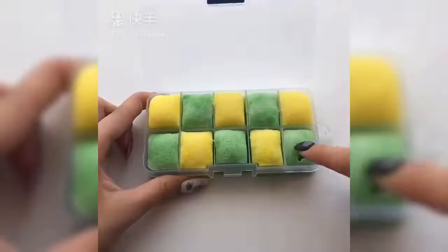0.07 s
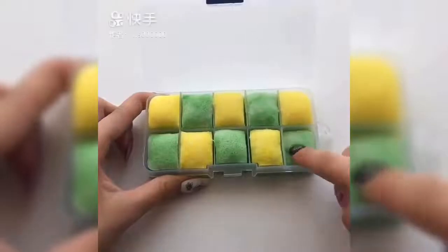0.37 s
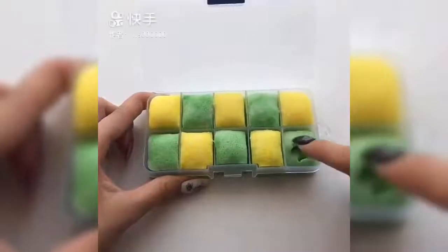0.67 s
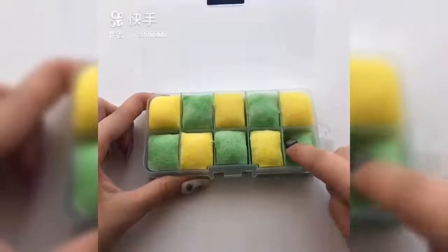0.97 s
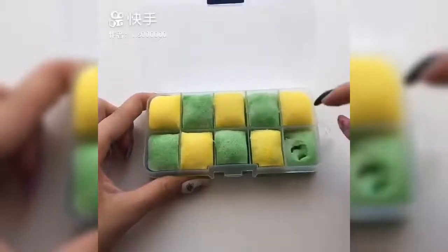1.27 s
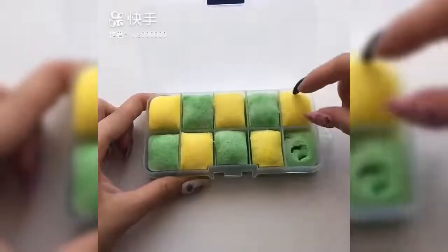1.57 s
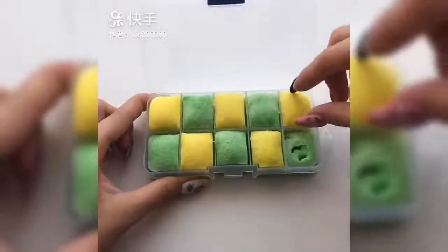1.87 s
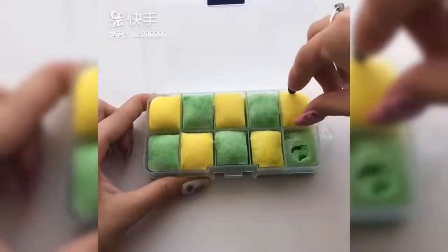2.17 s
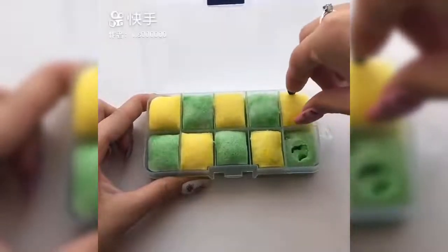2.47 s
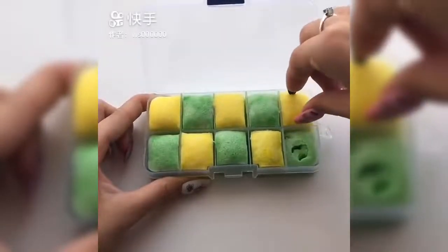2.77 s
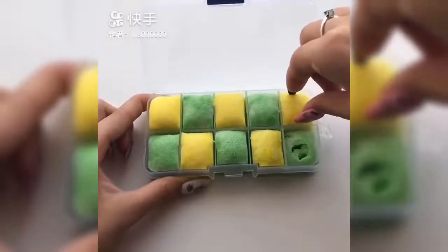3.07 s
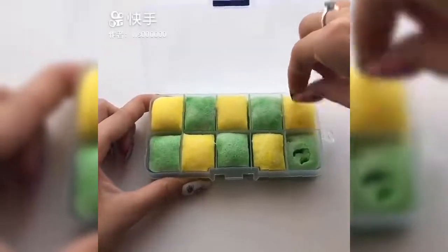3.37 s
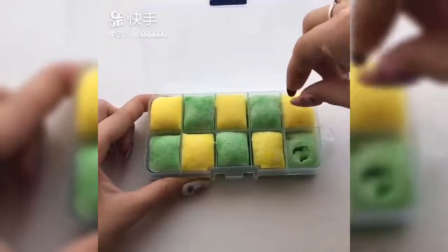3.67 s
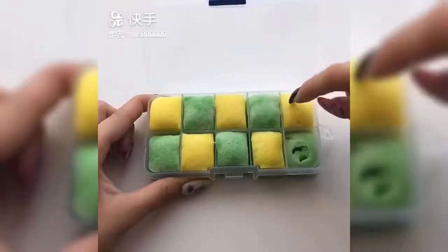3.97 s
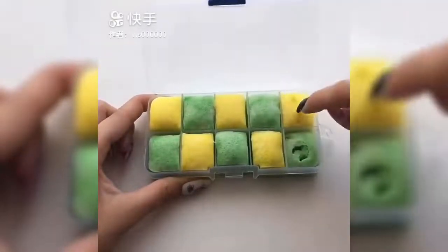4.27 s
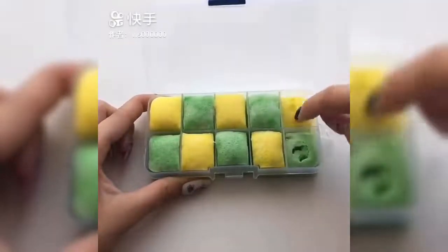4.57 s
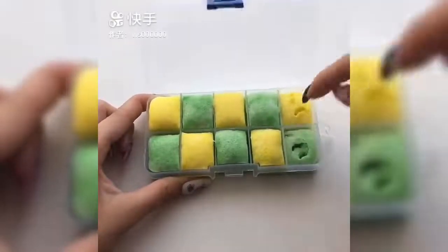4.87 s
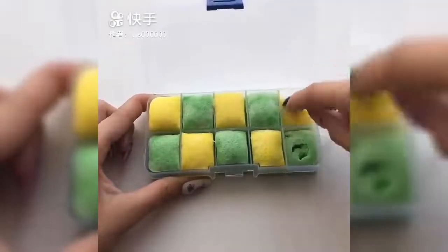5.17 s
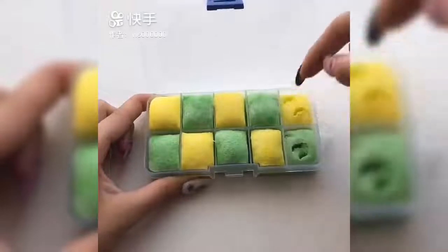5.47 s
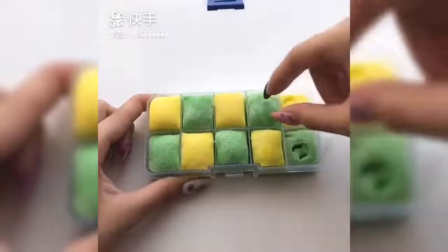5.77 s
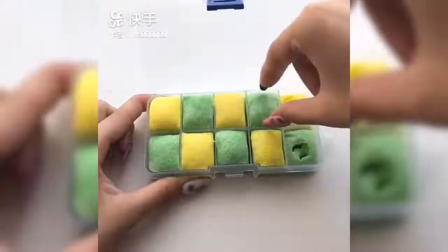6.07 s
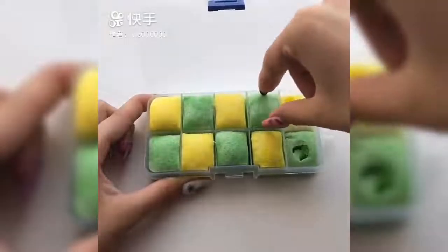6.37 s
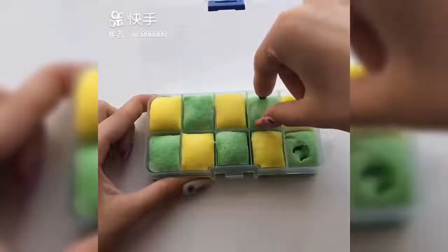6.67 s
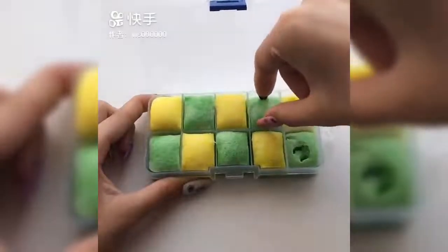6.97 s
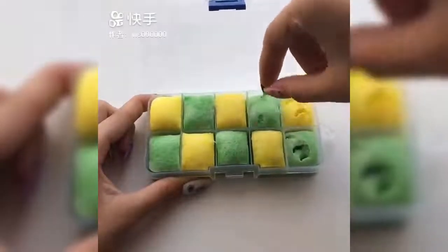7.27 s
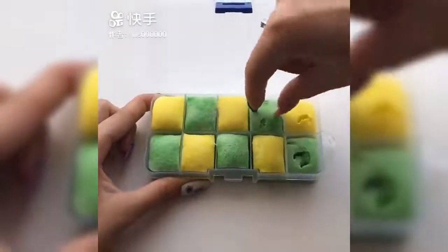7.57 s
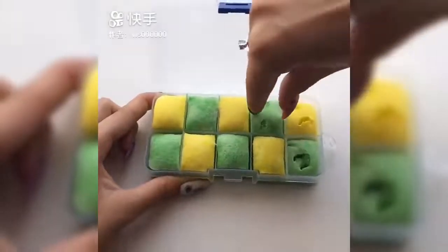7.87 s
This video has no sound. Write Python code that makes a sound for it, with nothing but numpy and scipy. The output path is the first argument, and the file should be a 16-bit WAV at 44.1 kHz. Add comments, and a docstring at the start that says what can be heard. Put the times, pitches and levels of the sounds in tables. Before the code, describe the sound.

Dried, foamy slime crackles and rips under fingertips, with air pockets popping and nails occasionally cracking against its plastic box.

```python
"""Crusted slime in a plastic box

A phone stands close to a compartment box on a table in a small, quiet room. Fingers poke and pinch the
crusted, foamy slime inside: each stroke tears countless tiny cells, a fizzy crackle, and air pockets
rip or pop. The box bumps on the table, fingers rub it, and a few times a nail snaps through the crust
onto the plastic. Behind it all are the walls' short answer and a low murmur of air."""
import sys
import numpy as np
from scipy import signal
from scipy.fft import rfft, irfft, next_fast_len
from scipy.io import wavfile
from scipy.ndimage import uniform_filter1d, map_coordinates

SR = 44100
rng = np.random.default_rng(int(sys.argv[2]) if len(sys.argv) > 2 else 0)


def unload_wav(signal):
    """Save mono or channel-first audio to the path in sys.argv[1] as 16-bit WAV at rate SR, clipped to [-1, 1]."""
    wavfile.write(
        sys.argv[1],
        SR,
        np.round(np.clip(np.atleast_2d(signal).T, -1, 1) * 32767).astype(np.int16),
    )


N = 349713

# Spectra of the sources. Each row: frequency in Hz, relative level in dB.
AIR_SPECTRUM = [(15, -55.5), (25, -11.5), (49, -6), (69, 0), (86, -9), (107, -5), (227, -2.5), (267, -5.5),
                (368, -7.5), (399, -11), (614, -16.5), (1050, -18), (1800, -24), (9050, -31.5),
                (15500, -40)]
CRUST_SPECTRUM = [(100, -33), (300, -7.5), (560, 1), (780, -10.5), (1200, 4), (1550, -2.5), (1950, 1.5),
                  (2400, -4), (3000, -2), (3700, -3), (4700, -6), (6500, -13), (9000, -22.5), (16000, -38)]
FIZZ_SPECTRUM = [(1000, -22), (3000, -12.5), (5000, -1), (8500, -1), (10500, -4.5), (15500, -7)]
SKIN_TICK_SPECTRUM = [(300, -25), (1000, 3), (2000, -3), (6000, -1.5), (8500, -8), (10500, -17.5),
                      (16000, -18)]
NAIL_SPECTRUM = [(100, -21.5), (300, -14), (410, 3.5), (780, -14.5), (1050, 2), (2600, -1), (4500, -4),
                 (6000, -10), (8500, -13.5), (10000, -20.5), (16000, -21.5)]
# A finger pushing into the slime. Each row: start in seconds, length in seconds, relative level in dB,
# swell over the stroke in dB, offset for the fizz in dB.
FINGER_STROKES = [ (0.047, 0.025, -47, -1.5, -12), (0.087, 0.015, -52, 5, -1.5),
                  (0.345, .08, -52, 2, -12.5), (0.439, 0.11, -44.5, -1, -2), (0.663, .063, -58, 13, -5),
                  (0.941, 0.095, -49, -0.5, -14), (1.059, 0.21, -54, -9, -6),
                  (1.287, 0.052, -56.5, -0.5, -13.5), (1.348, 0.035, -59.5, 13, -4),
                  (1.929, 0.027, -56, 9.5, -22), (2.365, .21, -67, 6.5, -1), (3.260, .035, -63.5, -3, -7),
                  (4.021, .085, -62, -0.5, -15), (4.172, 0.074, -61.5, -2, -24),
                  (4.662, 0.043, -64, 9, 0.5), (4.71, 0.081, -45.5, -5, -12), (4.816, 0.042, -38, -4.5, -5),
                  (4.868, .07, -52, -5, -4.5), (5.035, 0.029, -62, 5, -2), (5.065, .034, -49, 3, -2),
                  (5.36, 0.033, -40.5, 1, -9), (5.407, .13, -50, -3.5, -2.5),
                  (5.608, 0.032, -47, 4.5, -5.5), (6.044, 0.016, -53.5, 2.5, -14.5),
                  (6.104, .012, -51.5, -1, -1), (6.284, .016, -51.5, 2, -18), (6.668, 0.023, -50, -5, -1.5),
                  (6.711, 0.067, -52.5, 4, -6.5), (7.273, 0.017, -35.5, 0, -6),
                  (7.774, 0.051, -57.5, -1, -5.5), (7.899, 0.018, -52.5, 4.5, -10)]
# The crust ripping over a pocket. Each row: start in seconds, relative level in dB, pitch in Hz,
# decay of the rip in seconds.
CRUST_RIPS = [(0.099, -31.5, 3630, .005), (0.135, -50, 3000, .01), (0.214, -44.5, 2920, .015),
              (0.269, -32, 3800, 0.045), (0.3035, -32, 2730, 0.078), (0.342, -38, 3020, .04),
              (0.3605, -30.5, 2420, .024), (0.4346, -26, 1610, .03), (0.633, -38.5, 2600, 0.022),
              (0.905, -43.5, 2460, .02), (1.0233, -28, 2600, .005), (1.3792, -31, 4200, 0.0032),
              (1.73, -32, 1270, 0.08), (2.069, -30, 3250, 0.0016), (2.177, -35.5, 2330, 0.12),
              (2.744, -43, 6600, .005), (3.6023, -37, 1500, .012), (4.298, -44, 2200, .08),
              (4.71, -30.5, 1900, .006), (5.0628, -37.5, 2300, .02), (5.091, -30.5, 3100, .004),
              (5.354, -25, 1850, .15), (5.621, -32, 1900, .08), (6.1583, -32, 1740, .031),
              (6.203, -43, 3500, .025), (6.228, -34.5, 3200, .016), (6.304, -41, 1900, 0.0076),
              (7.2779, -26, 1700, .004), (7.746, -39, 1500, 0.03), (7.9084, -24.5, 3050, .011)]
# The box bumping on the table. Each row: start in seconds, relative level in dB, colour centre in Hz.
TABLE_BUMPS = [(0.44, -35.5, 110), (1.021, -41.5, 130), (1.388, -42, 110), (1.737, -38, 100),
               (3.638, -22.5, 216.5), (4.744, -39.5, 120), (4.817, -30, 130), (5.107, -18.5, 240),
               (5.128, -30, 85), (5.639, -37.5, 400), (6.421, -32, 80), (7.292, -26, 328)]
# The box's modes. Each row: frequency in Hz, relative level in dB, t60 in seconds before damping.
BOX_MODES = [(67.5, -6, .3), (105.5, -4.5, 0.33), (168, 1.5, .1), (208.1, -2.5, 0.14), (358.6, -0.5, 0.1),
             (455, -2, 0.057), (590, 3, 0.074), (1160, -5.5, 0.25), (1310, -8.5, 0.15), (1706, -19.5, 0.2),
             (1920, -17.5, 0.088), (2232, -15, 0.066)]
# A finger sliding on the box. Each row: start in seconds, length in seconds, relative level in dB,
# colour centre in Hz.
FINGER_RUBS = [(1.729, 0.059, -52, 1260), (1.795, .1, -52, 1450), (1.96, 0.12, -56, 1700),
               (3.3, 0.35, -62, 103), (2.722, 0.12, -55.5, 250), (2.6, 0.85, -63.5, 320),
               (4.5, 0.49, -73, 1700), (6.46, 0.11, -55.5, 2100), (7, 0.33, -64, 85)]
# Air pockets bursting. Each row: start in seconds, relative level in dB, pitch in Hz,
# the skin's tick in dB against the ring.
POCKET_POPS = [(1.956, -24.5, 1370, -6.5), (2.1826, -36, 1250, 4), (3.6276, -15, 1170, -11),
               (3.7105, -30, 1110, -27), (3.7925, -35.5, 1070, -18), (4.4424, -40, 1230, -14),
               (4.5803, -43, 1210, -13), (4.7472, -33, 1230, -9), (5.1974, -27.5, 1060, -26.5),
               (5.2244, -22.5, 1090, -24), (6.1206, -12, 1345, -5.5), (6.5350, -22.5, 1300, -11.5),
               (7.3192, -25, 1240, -25), (7.3338, -25, 1240, -32)]
# Slow pinches. Each row: start and end in seconds, cracks per second, relative level in dB,
# middle pitch in Hz.
SLOW_PINCHES = [(2.33, 2.599, 50, -47, 5640), (2.62, 2.84, 22, -52, 6000), (4.03, 4.396, 22, -49.5, 1660),
                (6.78, 7.025, 19.7, -52.5, 3470)]
# A nail hitting the plastic. Each row: start in seconds, relative level in dB, colour centre in Hz,
# decay in seconds.
NAIL_SNAPS = [(3.6356, -11.5, 2890, 0.033), (3.6440, -20, 2800, 0.03), (3.6500, -30, 10700, 0.065),
              (5.104, -6.5, 2030, 0.033), (6.4172, -23, 1525, .018), (7.2864, -22, 13940, 0.029),
              (7.2885, -17, 1490, 0.019)]
# The small room's decay. Each row: frequency in Hz, t60 in seconds.
ROOM_DECAY = [(100, .4), (300, 0.53), (1000, 0.3), (2200, 0.24), (5000, 0.27), (9000, 0.12), (15000, 0.079)]
# The strength of the walls' answer. Each row: frequency in Hz, relative level in dB.
WALL_COLOUR = [(100, 1.5), (1100, -4.5), (2200, 0.5), (4000, -4), (6500, -2.5), (8500, 2.5), (10500, 1.5)]

POP_CYCLES, RIP_CYCLES = 6.5, 4  # to fall 60 dB: a closed pocket rings longer than a torn one


def amp(db):
    """Decibels to gain."""
    return 10 ** (np.asarray(db) / 20)


def unit(x):
    """Scale to rms 1."""
    return x / np.sqrt(np.mean(x ** 2) + 1e-20)


def along(points, hz):
    """(Hz, value) points joined on a log axis."""
    f, v = np.transpose(points)
    return np.interp(np.log(hz + 1), np.log(f + 1), v)


def filtered(x, response):
    """x through a gain that depends on frequency."""
    size = next_fast_len(len(x) + SR // 2)
    return irfft(rfft(x, size) * response(np.fft.rfftfreq(size, 1 / SR)), size)[:len(x)]


def coloured(x, gain_db, size=2048):
    """x given a spectrum by a minimum-phase click of energy 1, which keeps attacks sharp."""
    cepstrum = irfft(np.log(amp(gain_db(np.fft.rfftfreq(size, 1 / SR)))))
    cepstrum[1:size // 2] *= 2
    cepstrum[size // 2 + 1:] = 0
    click = irfft(np.exp(rfft(cepstrum)))
    return signal.fftconvolve(x, click / np.linalg.norm(click))[:len(x)]


def add(track, start, sound):
    """Mix a sound into the track at a start in seconds."""
    part = track[max(round(start * SR), 0):][:len(sound)]
    part += sound[:len(part)]


def wobble(rate):
    """A smooth random curve, rate knots a second."""
    knots = rng.standard_normal(int(N * rate / SR) + 4)
    return map_coordinates(knots, [np.arange(N) * rate / SR])


def room_tone():
    """The room's low, slightly restless murmur of air, with a thin hiss."""
    air = unit(filtered(rng.standard_normal(N), lambda hz: amp(along(AIR_SPECTRUM, hz))))
    return air * amp(-58 + 0.38 * wobble(3.3))


def cells(spectrum, level, density, spread_db):
    """Foam cells break at random: single ticks under gentle tearing, a dense fizz when it is hard."""
    chance = np.clip(density * (level / amp(-50)) ** .7 / SR, 1e-4, 1)
    sizes = unit(amp(spread_db * np.clip(rng.standard_normal(N), -2.5, 2.5)))
    signs = rng.choice([-1, 1], N)
    breaks = (rng.random(N) < chance) * sizes * signs * level / np.sqrt(chance)
    return coloured(breaks, lambda hz: along(spectrum, hz))


def hollow(x, depth_db):
    """The hole changes shape under the finger, so its resonances shift every few tens of ms."""
    spectra = signal.stft(x, nperseg=512)[2]
    peaks = uniform_filter1d(rng.standard_normal(spectra.shape), size=4, axis=0)
    drifting_peaks = unit(uniform_filter1d(peaks, size=12, axis=1))
    return signal.istft(spectra * unit(amp(depth_db * drifting_peaks)), nperseg=512)[1][:N]


def tearing():
    """Each stroke tears the crust and squeezes the foam under it; cells give way in clumps."""
    lead_s, usual_length_s = .05, 0.057
    grip_db_per_s, relax_db_per_s = 1399.5, 700  # for a stroke of the usual length
    t = np.arange(SR // 2) / SR - lead_s
    crust_level, fizz_level = np.zeros(N), np.zeros(N)
    for start, length, db, swell_db, fizz_db in FINGER_STROKES:
        depth = np.clip(t / length, 0, 1)
        slack_db = grip_db_per_s * np.maximum(-t, 0) + relax_db_per_s * np.maximum(t - length, 0)
        briskness = (usual_length_s / length) ** 0.25  # short strokes start and stop faster
        push = amp(db + swell_db * depth - slack_db * briskness)
        add(crust_level, start - lead_s, push)
        add(fizz_level, start - lead_s, push * amp(fizz_db))
    clumps = unit(amp(1.2 * wobble(170)))
    crust = amp(-0.6) * cells(CRUST_SPECTRUM, crust_level, density=1800, spread_db=1.5)
    fizz = amp(1.5) * cells(FIZZ_SPECTRUM, fizz_level, density=2400, spread_db=2.5)
    return clumps * (hollow(crust, depth_db=3.2) + fizz)


def fractures(t, decay_s):
    """A volley of tiny fractures builds quickly and dies away; a longer one carries more energy."""
    fade = amp(-60 * t / decay_s)
    rise = 1 - np.exp(-t / (0.015 * decay_s))
    spectrum = rfft(fade * rise * rng.standard_normal(len(t)), 2 * len(t))
    evened = spectrum / (np.abs(spectrum) + 1e-9) ** .5
    volley = irfft(evened)[:len(t)] * fade ** .1
    return volley * np.linalg.norm(fade) / np.linalg.norm(volley)


def pocket(hz, decay_s, tick_db=-4.5, cycles=RIP_CYCLES):
    """A pocket's skin tears with a dry tick; the pocket and the air in its compartment ring briefly."""
    t, compartment_hz = np.arange(SR // 12) / SR, 2150
    share = amp(min(tick_db + 2, -4))  # a soft rip barely wakes the compartment
    modes = np.sin(2 * np.pi * hz * t) - share * np.sin(2 * np.pi * compartment_hz * t)
    cavity = modes * amp(-60 * hz * t / cycles) * (1 - np.exp(-hz * t / 2.1))
    ring = signal.fftconvolve(fractures(t, decay_s), cavity)[:len(t)]
    tick = coloured(fractures(t, decay_s + 0.0064), lambda f: along(SKIN_TICK_SPECTRUM, f))
    return amp(-25.5) * (unit(ring) + amp(tick_db) * unit(tick))


def rips():
    """The crust rips open over air pockets; a long rip is a squelch."""
    out = np.zeros(N)
    for start, db, hz, decay_s in CRUST_RIPS:
        add(out, start, amp(db) * pocket(hz, decay_s))
    return out


def box_ring(t, centre_hz, cut_db_per_octave, damping):
    """The box rings around a centre that is higher for a harder contact; a resting finger damps it."""
    gains = [amp(db - cut_db_per_octave * np.abs(np.log2(hz / centre_hz)) + rng.normal(0, 1))
             for hz, db, _ in BOX_MODES]
    ring = np.zeros(len(t))
    for gain, (hz, _, t60) in zip(gains, BOX_MODES):
        phase = 2 * np.pi * (hz * rng.normal(1, .01) * t + rng.random())
        ring += gain * amp(-60 * t * damping / t60) * np.sin(phase)
    return ring


def bumps():
    """A push rocks the box on the table."""
    out, t = np.zeros(N), np.arange(SR // 2) / SR
    rise = 1 - np.exp(-t / .002)
    for start, db, centre_hz in TABLE_BUMPS:
        add(out, start, amp(db - 4) * rise * box_ring(t, centre_hz, cut_db_per_octave=5, damping=0.94))
    return out


def rubs():
    """Stick and slip drives the box: a fingertip the low modes, a nail the high ones with a scratch."""
    out, t = np.zeros(N), np.arange(SR // 4) / SR
    slips_per_s = 2500
    for start, length, db, centre_hz in FINGER_RUBS:
        ring = box_ring(t, centre_hz, cut_db_per_octave=20.5, damping=centre_hz / 100)
        ring *= 1 - np.exp(-t * centre_hz)
        size = int(length * SR)
        slips = rng.standard_normal(size) * (rng.random(size) < slips_per_s / SR)
        body = unit(signal.fftconvolve(slips, ring)[:size])
        scratch = centre_hz / 2600 * unit(coloured(slips, lambda hz: along(CRUST_SPECTRUM, hz)))
        add(out, start, amp(db) * np.sqrt(np.hanning(size)) * (body + scratch))
    return out


def pops():
    """A pocket's skin gives way at once, with a round pop."""
    out = np.zeros(N)
    for start, db, hz, tick_db in POCKET_POPS:
        add(out, start, amp(db) * pocket(hz, decay_s=0.00079, tick_db=tick_db, cycles=POP_CYCLES))
    return out


def pinches():
    """A slow pinch scatters tiny cracks through the crust at random."""
    out, spread_db = np.zeros(N), 1.5
    for start, end, per_second, db, hz in SLOW_PINCHES:
        count = int(per_second * (end - start))
        for onset, size, octaves in rng.uniform([start, -1, -.5], [end, 1, .5], (count, 3)):
            add(out, onset, amp(db + spread_db * size) * pocket(hz * 2 ** octaves, decay_s=0.0016))
    return out


def snaps():
    """A nail breaks through and strikes the side of the box: a hard, broad crack."""
    out, t = np.zeros(N), np.arange(SR // 10) / SR
    for start, db, centre_hz, decay_s in NAIL_SNAPS:
        colour = lambda hz: along(NAIL_SPECTRUM, hz) - 1.7 * np.abs(np.log2((hz + 100) / centre_hz))
        add(out, start, amp(db) * coloured(fractures(t, decay_s), colour))
    return out


def walls(x, wet_db, stretches=16):
    """The near walls answer after a few ms; a fresh tail for each stretch stands for the moving hands."""
    out, delay_s = np.zeros(N), .002
    for part in np.array_split(np.arange(N), stretches):
        hz, t, noise = signal.stft(rng.standard_normal(SR // 2), SR, nperseg=256)
        fade = amp(-60 * t / along(ROOM_DECAY, hz)[:, None])
        tail = signal.istft(noise * fade, SR, nperseg=256)[1]
        add(out, part[0] / SR + delay_s, signal.fftconvolve(x[part], tail / np.linalg.norm(tail)))
    return filtered(out, lambda hz: amp(wet_db + along(WALL_COLOUR, hz)))


def scene():
    """Slime and box close up, in mono; pockets deep in a compartment reach the walls less."""
    surface = tearing() + snaps()
    deep = pops() + rips() + pinches()
    reflections = walls(surface + amp(-3) * deep, wet_db=-10.5)
    return (surface + deep + reflections + bumps() + rubs() + room_tone())[None]


def record(dry):
    """The phone's microphone drops the deepest bass, and nothing is kept above its band limit."""
    low_cut_hz, top_hz = 32, 15950
    low_cut = signal.butter(3, low_cut_hz, "highpass", fs=SR, output="sos")
    return np.array([filtered(signal.sosfilt(low_cut, channel), lambda hz: hz < top_hz)
                     for channel in dry])


dry = scene()
out = record(dry)
unload_wav(out)
```